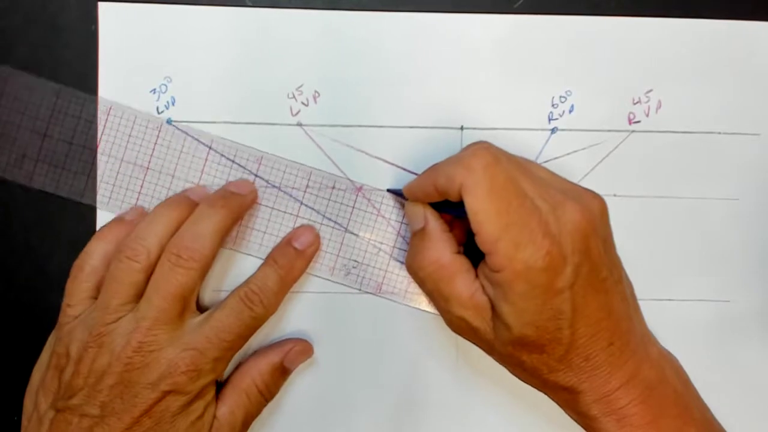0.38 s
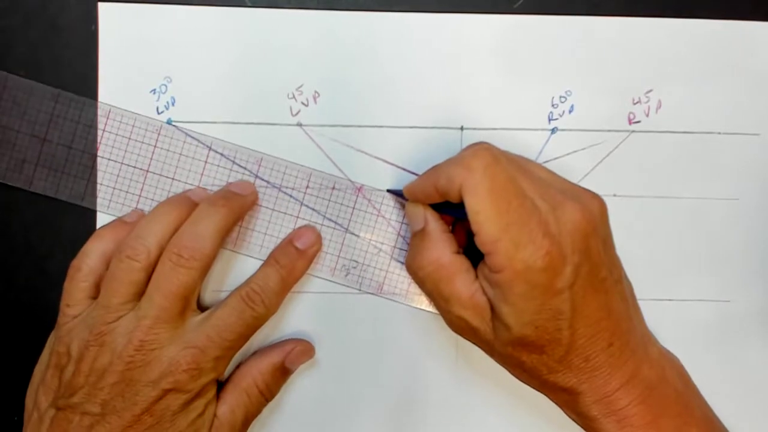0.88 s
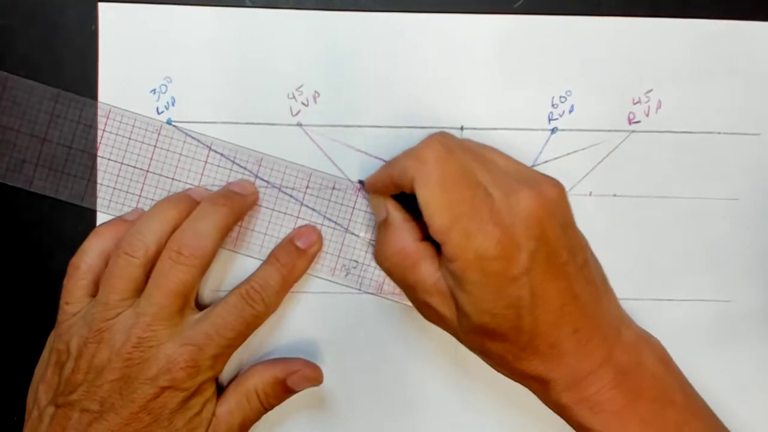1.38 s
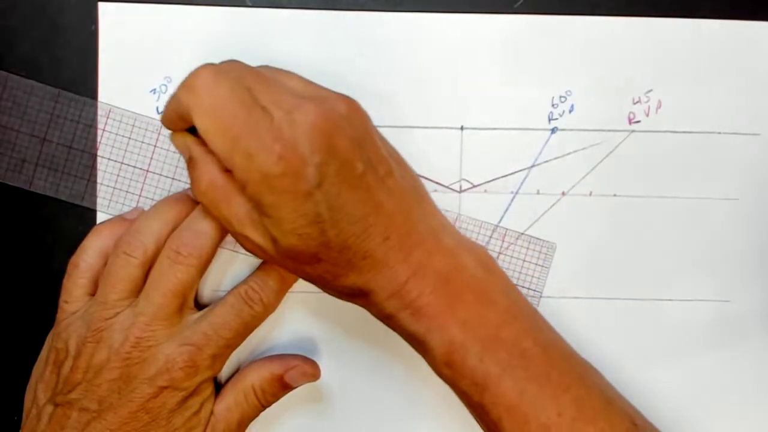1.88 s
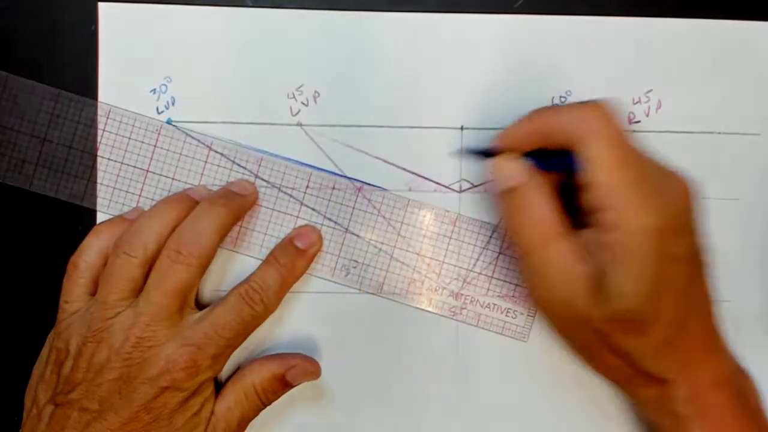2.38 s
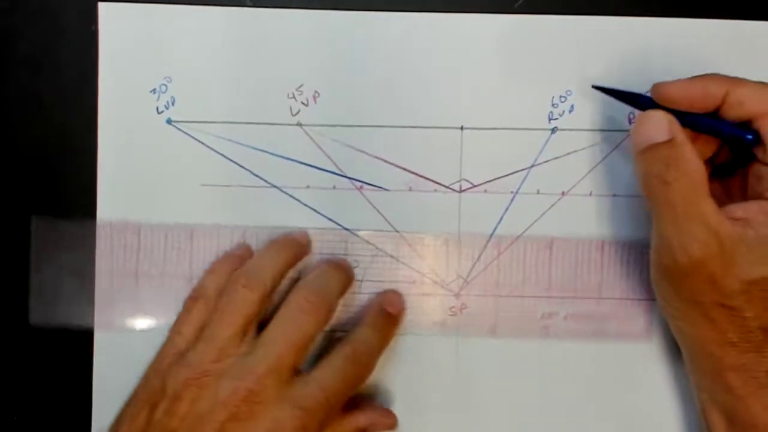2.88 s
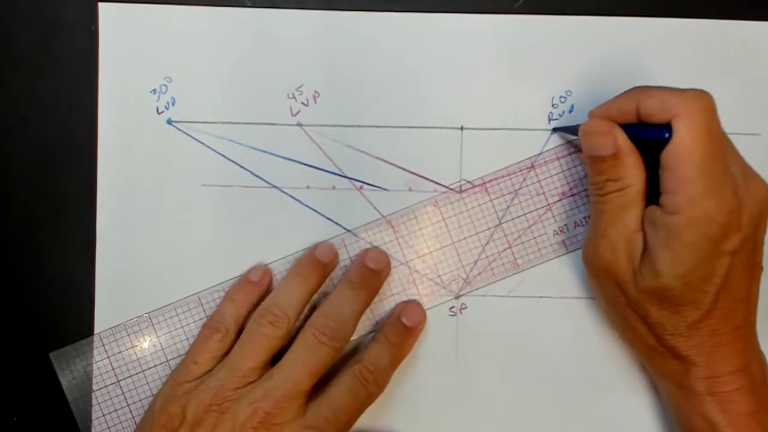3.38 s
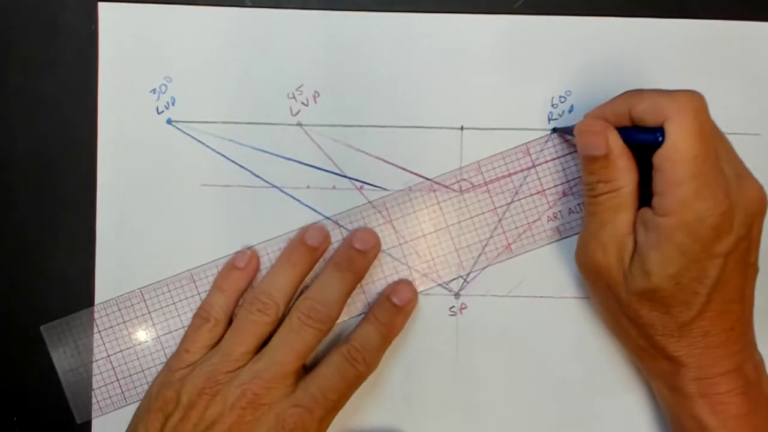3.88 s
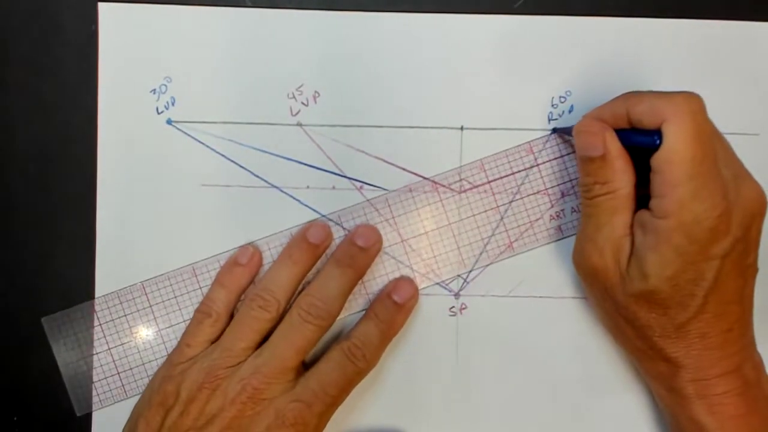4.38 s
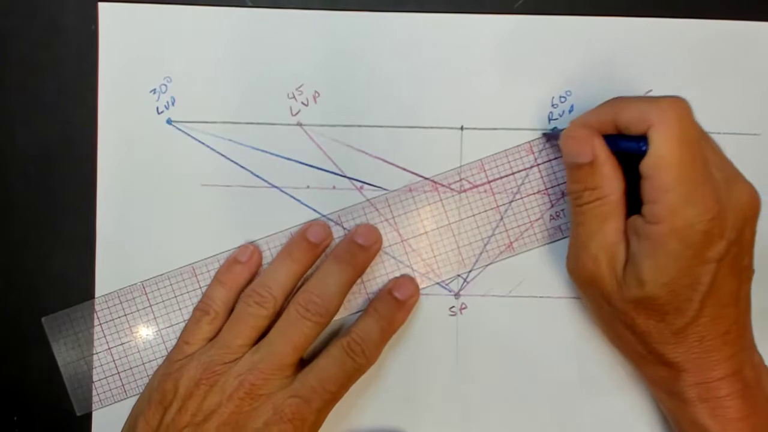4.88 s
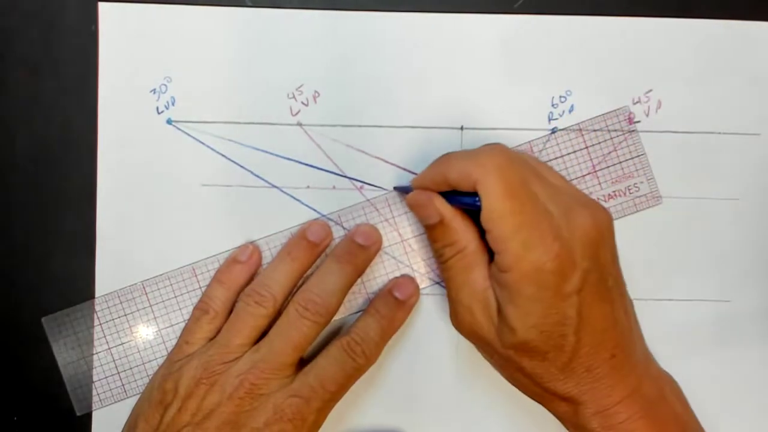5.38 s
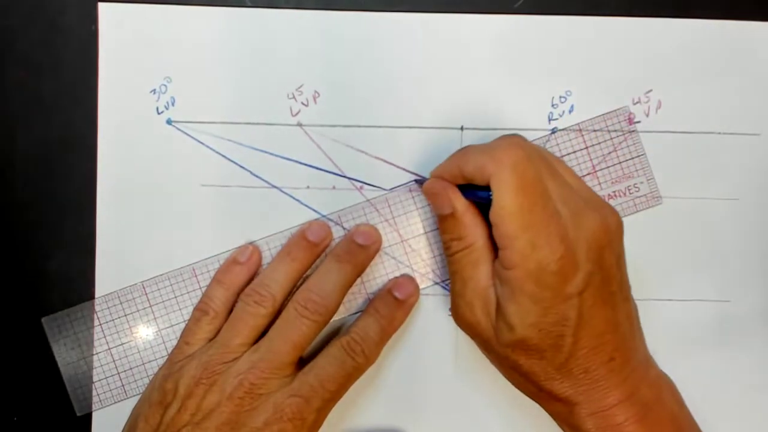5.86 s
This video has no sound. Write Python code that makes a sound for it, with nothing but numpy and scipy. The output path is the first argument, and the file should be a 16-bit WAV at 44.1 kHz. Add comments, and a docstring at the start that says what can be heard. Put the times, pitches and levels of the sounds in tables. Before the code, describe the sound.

A quiet, dry room with steady faint hiss, heard through a microphone standing on the desk, so arm movements come across as low, soft thuds and rumbling. In the first second there are only a slight brush of skin on paper and dull bumps. Tiny ticks of pen and ruler come at 1.1 to 1.3 s, then from about 1.35 s a grainy pen scratch runs along the ruler edge, fades towards 2.0 s, and returns as a second stroke until about 2.4 s. From 2.55 to 3.2 s the ruler slides over the paper in bright, rustling sweeps, the strongest movement, with a cluster of thuds and a click near 2.8 s. Small plastic taps follow at 3.35 and 3.57 s. It calms to sparse bumps and faint rubs until a smooth hand slide at 4.9 to 5.35 s. Short, light pen scratches come at about 5.45, 5.75 and 6.0 s.

```python
"""At a desk in a quiet room, a pen draws along a plastic ruler on paper; hand and ruler slide over the sheet.
The microphone stands on the same desk: pushes ring its modes as low thuds, and resting arms sway and judder it.
Grainy noise makes the pen's scratch, edge scrape and tip hiss, and the smoother slides of skin and ruler.
Touches of pen tip and ruler ring decaying sines with bursts of noise, over a steady hiss with narrow bands."""
import sys
import numpy as np
from scipy import signal
from scipy.fft import rfft, irfft, next_fast_len
from scipy.io import wavfile
from scipy.ndimage import uniform_filter1d, map_coordinates

SR = 44100
rng = np.random.default_rng(int(sys.argv[2]) if len(sys.argv) > 2 else 0)


def master_out(mix):
    """Clip the mix to full scale and print it as 16-bit PCM to the path in sys.argv[1]."""
    frames = np.transpose(np.atleast_2d(mix))
    ceiling = np.clip(frames, -1, 1)
    pcm = np.round(ceiling * 32767).astype(np.int16)
    wavfile.write(sys.argv[1], SR, pcm)


def gain_from_db(level_db):
    """Turn a decibel level (scalar or array-like) into a linear amplitude factor."""
    decades = np.asarray(level_db, float) / 20
    return 10 ** decades


N = 275344
TURN_S, DABS_S = 2.04, 5.4  # the pen turns back; later it only dabs, under the resting hand

# pushes on the desk: t/s, strength/dB, direction (1 or -1), contact before softening/ms
PUSHES = [(0.5437, -28.5, 1, 0.9), (0.9143, -31.5, -1, 1.7), (1.3166, -36, 1, 1.8), (1.341, -29.5, 1, 5.5),
          (1.3729, -27.5, -1, 4.9), (1.3996, -25.5, 1, 7.4), (1.45, -35, -1, 16), (1.479, -27.5, 1, 4.2),
          (1.5242, -26.5, -1, 0.57), (1.6075, -32.5, -1, 4.3), (1.9621, -32.5, 1, 1.8),
          (2.538, -23.5, -1, 0.5), (2.6442, -23.5, -1, 3.3), (2.679, -21.5, 1, 3.5), (2.706, -24, 1, 4.9),
          (2.7631, -19.5, 1, 10.2), (2.8018, -34, -1, 2.9), (2.838, -27, 1, 7), (2.8847, -26, -1, 4.4),
          (2.9352, -21, -1, 17), (2.9635, -35.5, -1, 2.4), (2.998, -32, -1, 11), (3.0931, -33.5, -1, 5.3),
          (3.2155, -27.5, -1, 0.54), (3.2755, -32, 1, 9.3), (3.3128, -32.5, 1, 6.5), (3.352, -33, 1, 1.9),
          (3.3776, -24.5, -1, 3.8), (3.5, -31, 1, 7.9), (3.901, -33.5, 1, 2.45), (4.2723, -27, 1, 0.9),
          (4.5635, -31, -1, 2.2), (4.688, -29.5, -1, 9.4), (4.9054, -36, -1, 5.2), (5.127, -28.5, -1, 6.4),
          (5.169, -52, 1, 7), (5.3574, -36, 1, 4.9), (5.475, -45, 1, 5.8), (5.691, -39.5, 1, 7.1),
          (5.8922, -37, 1, 6.1)]
# skin and ruler sliding on paper: start/s, length/s, bright level/dB, low part re bright level/dB
SLIDE_STROKES = [(0.385, 0.14, -67, -1.5), (0.58, 0.058, -80, 3), (0.95, 0.15, -79, 5),
                 (1.05, 0.32, -79.5, 5), (1.22, 0.11, -74.5, 3.5), (2.605, 0.084, -61.5, 4),
                 (2.645, 0.18, -53, -6), (2.75, 0.14, -56.5, -1), (2.81, 0.14, -55.5, -4.5),
                 (2.91, 0.13, -55, -4), (2.97, 0.23, -61.5, -1.5), (3.2, 0.11, -69.5, -2),
                 (3.29, 0.13, -66.5, -1), (3.38, 0.13, -84, 11), (3.5, 0.097, -70.5, -0.5),
                 (3.58, .1, -82, 11), (3.7, 0.091, -75, 2), (3.82, 0.2, -84, 1), (4.11, 0.085, -75, 4),
                 (4.36, 0.052, -72, 1.5), (4.875, 0.13, -69, -1), (4.93, 0.2, -62.5, 1.5),
                 (4.97, 0.36, -57.5, -2), (5.13, 0.26, -61.5, -2.5)]


def unit(x):
    """Scaled to rms 1."""
    return x / np.sqrt(np.mean(x ** 2) + 1e-20)


def curves(rows):
    """One value per sample for each column after the time."""
    s, *cols = np.transpose(rows)
    return [np.interp(np.arange(N) / SR, s, c) for c in cols]


def wobble(rate):
    """A smooth random curve, rate knots a second."""
    knots = rng.standard_normal(int(N * rate / SR) + 4)
    return map_coordinates(knots, [np.arange(N) * rate / SR])


def filtered(x, response):
    """x times a response of frequency."""
    m = next_fast_len(N + 8192)
    return irfft(rfft(x, m) * response(np.fft.rfftfreq(m, 1 / SR)), m)[:N]


def coloured(x, spectrum):
    """x shaped by (f/Hz, level/dB) points joined on a log frequency axis, rms 1."""
    f, db = np.transpose(spectrum)
    return unit(filtered(x, lambda hz: gain_from_db(np.interp(np.log(hz + 1), np.log(f + 1), db))))


def fibres(spread_db, patchy_db):
    """Paper fibres catching: noise with uneven grain sizes and streaks of random gain."""
    grains = rng.standard_normal(N) * gain_from_db(spread_db * wobble(900))
    z = signal.stft(grains, nperseg=512)[2]
    field = uniform_filter1d(rng.standard_normal(z.shape), size=3, axis=0)  # across frequency
    field = uniform_filter1d(field, size=20, axis=1)  # along time
    return signal.istft(z * gain_from_db(patchy_db * unit(field)), nperseg=512)[1][:N]


def fading(power, fade_s):
    """Power that dies away 60 dB in fade_s, as gain; steady power passes unchanged."""
    keep = gain_from_db(-2 * 60 / (fade_s * SR))
    return np.sqrt(signal.lfilter([1 - keep], [1, -keep], power))


def swells(rows, peak, sharp):
    """Each row swells and sinks once, peaking at this share of its length; gains for level and relative columns."""
    linger_s = 0.075  # sheet and room die away 60 dB in this time
    power = 0
    for s, length, db, *rel in rows:
        progress = np.clip((np.arange(N) / SR - s) / length, 0, 1)
        warped = progress ** (np.log(.5) / np.log(peak))
        swell = np.abs(np.sin(np.pi * warped)) ** sharp  # sharper means narrower
        power = power + np.outer(gain_from_db(db + np.array([0, *rel])), swell) ** 2
    return fading(power, linger_s)


def slide_gains():
    """Gains of the bright and low parts of each slide as it speeds up and slows down."""
    return swells(SLIDE_STROKES, peak=0.39, sharp=1.26)


def after_pushes(fade_s):
    """A gain that swells as the weight settles after every push and falls 60 dB in fade_s."""
    settle_s = .02  # the weight settles most strongly this long after a push
    power, settle = np.zeros(N), np.hanning(round(2 * settle_s * SR))
    for s, db, *_ in PUSHES:
        power[round(s * SR):][:len(settle)] += gain_from_db(2 * db) * settle
    return fading(power, fade_s)


def pen_motion():
    """Gains of scratch, edge scrape and tip hiss, from the pen's pressure and speed and its later dabs."""
    # the line, pushed out and pulled back: t/s, pressure as scratch level/dB, speed as hiss level/dB
    line = [(1.328, -120, -120), (1.343, -58.5, -65.5), (1.44, -61.5, -69), (1.49, -57, -60),
            (1.6, -57.5, -56.5), (1.72, -61.5, -59), (1.81, -67, -63), (1.85, -69, -68), (1.96, -71, -68),
            (2.01, -79, -86), (2.07, -82, -80), (2.11, -68, -66.5), (2.2, -63.5, -60.5), (2.3, -59, -60),
            (2.35, -64, -64.5), (2.38, -70, -76), (2.47, -120, -120)]
    # short dabs: start/s, length/s, scratch level/dB, edge scrape re scratch/dB, tip hiss re scratch/dB
    dab_strokes = [(5.45, 0.084, -71.5, -2.5, 3), (5.744, .13, -63.5, -5, 5), (5.88, .1, -78.5, -2, -3),
                   (5.986, 0.15, -65, -5.5, 3), (6.1, .1, -74, -10, -5)]
    push_db, pull_db = -61, -62.5  # edge scrape at a -60 dB stroke
    grows_db_per_s = 2.5  # the pushed pen leans ever more into the edge
    per_pressure, per_speed = 0.24, 0.38  # dB of scrape per dB of each
    pressure_db, speed_db = curves(line)
    t = np.arange(N) / SR
    edge_db = np.where(t < TURN_S, push_db + grows_db_per_s * (t - line[4][0]), pull_db)
    edge_db = edge_db + per_pressure * (pressure_db + 60) + per_speed * (speed_db + 60)
    edge_db = np.minimum(edge_db, pressure_db + 10)  # no scrape once the pen lifts
    scratch, edge, _ = swells(dab_strokes, peak=0.35, sharp=0.43)
    hiss = swells(dab_strokes, peak=0.36, sharp=2.2)[2]
    return gain_from_db(pressure_db) + scratch, gain_from_db(edge_db) + edge, gain_from_db(speed_db) + hiss


def floor():
    """Room air and preamplifier: steady hiss with a few narrow bands."""
    # spectrum of the hiss: f/Hz, density/dB
    air = [(150, -27), (250, 1), (660, -12), (812, -9.5), (2070, -19), (2590, -22.5), (3190, -21),
           (7850, -22.5), (8710, -26), (15700, -27.5)]
    # narrow bands standing in it: f/Hz, width/Hz, level/dB
    whines = [(2620, 880, -89), (4600, 50, -93.5), (5734, 53, -89.5), (6460, 260, -89.5), (7680, 260, -92),
              (8020, 500, -85.5)]
    out = gain_from_db(-70.5) * coloured(rng.standard_normal(N), air)
    for centre_hz, width_hz, db in whines:
        band = filtered(rng.standard_normal(N), lambda hz: 1 / (1 + (2 * (hz - centre_hz) / width_hz) ** 2))
        out = out + gain_from_db(db) * unit(band)
    return out


def desk_thuds():
    """Pushes ring the modes of desk and microphone stand; a longer contact drives fewer high modes."""
    # modes: f/Hz, first swing (1 = up), t60/s
    modes = [(39.1, -.49, .275), (49.8, .1, .8), (70.1, .68, .212), (96.7, .25, .354), (162, .07, .129),
             (198, .52, .044), (226.2, -.1, .225), (237.9, -.31, .092), (435, .03, .1)]
    t = np.arange(SR // 2) / SR
    ring = sum(swing * gain_from_db(-60 * t / t60) * np.sin(2 * np.pi * hz * t) for hz, swing, t60 in modes)
    force = np.zeros(N + SR)
    for s, db, direction, ms in PUSHES:
        contact = np.hanning(round(max(ms, 1.4) * SR / 1000) + 40)  # softened by 40 samples
        force[round(s * SR):][:len(contact)] += direction * gain_from_db(db) * contact / contact.sum()
    return signal.fftconvolve(force, ring)[:N]


def desk_unrest():
    """The restless weight of the arms sways the desk; dragging pen, hand and ruler make it judder."""
    # how heavily the arms rest: t/s, sway level before lurching/dB
    lean = [(0, -57), (.45, -56), (.84, -59.5), (1.05, -51.5), (1.9, -54), (2.4, -54.5), (3.6, -49),
            (4.1, -55.5), (4.85, -52.5), (5.45, -54), (5.64, -54.5), (6.24, -56.5)]
    # spectra of sway and judder: f/Hz, density/dB
    sway_spectrum = [(8.8, -34), (15, -0.5), (54, -2), (75, -9.5), (102, -6.5), (140, -22.5), (180, -68.5),
                     (310, -120)]
    judder_spectrum = [(79, -50), (135, -6), (162, 3.5), (199, -3), (231, 2), (302, -21), (424, -22),
                       (500, -33.5), (650, -53), (1100, -120)]
    # judder at a -60 dB scratch (pushed, pulled, dabbing) or a -60 dB slide
    pen_judder_db, slide_judder_db = [-51, -62, -47], -57
    per_pen, per_slide = 1.65, 0.78  # dB gained per dB of scratch, of slide
    scratch = pen_motion()[0]
    stage = np.searchsorted([TURN_S, DABS_S], np.arange(N) / SR)  # 0 pushed, 1 pulled, 2 dabbing
    pen_drag = gain_from_db(pen_judder_db)[stage] * (scratch / gain_from_db(-60)) ** per_pen
    slide_drag = gain_from_db(slide_judder_db) * (slide_gains()[0] / gain_from_db(-60)) ** per_slide
    # each in turn: at rest, after pushes (re their strength), while the pen works
    swaying = gain_from_db(curves(lean)[0]) + gain_from_db(-19) * after_pushes(fade_s=0.52) + gain_from_db(12.5) * scratch * (stage == 2)
    juddering = gain_from_db(-70.5) + gain_from_db(-25.5) * after_pushes(fade_s=0.1) + np.hypot(pen_drag, slide_drag)
    lurch_db = 3 * wobble(25)  # both come in lumps together
    sway = swaying * gain_from_db(0.57 * lurch_db) * coloured(rng.standard_normal(N), sway_spectrum)
    judder = juddering * gain_from_db(lurch_db) * coloured(rng.standard_normal(N), judder_spectrum)
    return sway + judder


def slide():
    """Skin and ruler rub the paper: a wide contact gives a smoother hiss than the pen."""
    # spectra of the bright part, the low part under the ruler and under the hand: f/Hz, density/dB
    rub = [(2650, -21), (4500, -11.5), (6200, -2.5), (7590, 1.5), (10600, -3.5), (12800, 0), (15500, -6.5)]
    drag = [(190, 3), (320, -6), (431, 1.5), (485, -6), (839, -14.5), (2330, -3), (5500, -11.5),
            (7150, -44), (12100, -120)]
    palm = [(190, -36), (320, -4), (463, -2), (640, -11), (1300, -12), (2200, -10), (4800, -16.5),
            (7150, -46), (12100, -120)]
    # the ruler moves: from/s, to/s
    ruler_moves = (2.5, 3.7)
    bright_gain, low_gain = slide_gains() * gain_from_db(0.67 * wobble(25))
    bright = bright_gain * coloured(fibres(spread_db=1.0, patchy_db=3.0), rub)
    low = fibres(spread_db=1.5, patchy_db=1.4)
    ruler = np.searchsorted(ruler_moves, np.arange(N) / SR) == 1
    return bright + low_gain * np.where(ruler, coloured(low, drag), coloured(low, palm))


def ticks():
    """Each touch rings the ruler briefly, with a crack and a short scuff; light touches start softly."""
    # pen tip and ruler edge touching: t/s, level before a 10 dB cut/dB, crack before a 15 dB lift/dB
    touches = [(1.1121, -48, -8), (1.17, -49.5, -15), (1.2301, -44, -22), (1.3428, -52, 5),
               (2.7949, -41, -14), (3.3398, -39, -13.5), (3.3472, -49, -18), (3.3584, -45, -22),
               (3.5688, -40, -11.5), (3.5824, -46, -22)]
    # ruler modes: f/Hz, mean level/dB, t60/s
    ruler_modes = [(1340, -8, 0.03), (2126, -9, 0.046), (2350, -2, 0.019), (3040, -3, 0.013),
                   (5440, -20, .01)]
    out, t = np.zeros(N + SR), np.arange(SR // 10) / SR
    for s, db, treble_db in touches:
        ring = 0
        for hz, level, t60 in ruler_modes:
            ring = ring + gain_from_db(level + rng.normal(0, 2.7) - 60 * t / t60) * np.sin(2 * np.pi * hz * t)
        crack = gain_from_db(treble_db + 15 - 60 * t / .016) * uniform_filter1d(rng.standard_normal(len(t)), size=2)
        scuff = gain_from_db(-60 * t / 0.12) * uniform_filter1d(rng.standard_normal(len(t)), size=7)
        rise = 1 - np.exp(-t / (.0002 * gain_from_db(2.6 * (-42 - db))))
        out[round(s * SR):][:len(t)] += gain_from_db(db - 10) * rise * (ring + crack + scuff)
    return out[:N]


def pen():
    """The tip scratches the sheet, scrapes the ruler and hisses; three bounces off hand and ruler comb the hiss."""
    # spectra, f/Hz, density/dB: low scratch of the line and of the dabs
    sheet = [(250, -20), (430, 0), (640, -9), (800, 1.5), (880, -7.5), (1000, 0), (1130, -10), (1380, 0),
             (1650, -7.5), (2200, -9.5), (3200, -54), (5000, -120)]
    dab = [(200, -30), (400, 4.5), (1000, -1.5), (2000, -13.5), (4000, -60)]
    # scrape on the ruler edge, pen pushed and after it turns back; hiss of the tip
    edge_pushed = [(1300, -32), (2200, -10), (2550, 0.5), (2850, -3), (3400, -1), (3950, -0.5), (4600, -6),
                   (5100, -14.5), (7000, -13), (12000, -120)]
    edge_pulled = [(1000, -26), (1700, 2.5), (3070, 5.5), (3470, 3), (5500, -4.5), (7150, -34),
                   (12100, -120)]
    tip = [(3500, -30), (5200, -7), (7500, 0), (8800, -1.5), (10000, -2), (12500, -4), (14500, 1),
           (15800, -1)]
    # bounces under the hand come sooner or later as it travels: t/s, first delay/ms, strength (0-1)
    bounces = [(1.35, .65, .28), (1.95, .52, .25), (2.1, .52, .22), (2.38, .6, .22), (5.75, .7, .4),
               (6.1, .72, .33)]
    scratch_gain, edge_gain, tip_gain = pen_motion()
    press = gain_from_db(0.39 * wobble(30))
    scratch = fibres(spread_db=0.5, patchy_db=1.7)
    dabbing = np.arange(N) > DABS_S * SR
    direct = press * scratch_gain * np.where(dabbing, coloured(scratch, dab), coloured(scratch, sheet))
    scrape = fibres(spread_db=0.5, patchy_db=2.5)
    pushed = np.arange(N) < TURN_S * SR
    direct += press * edge_gain * np.where(pushed, coloured(scrape, edge_pushed), coloured(scrape, edge_pulled))
    hiss = press * tip_gain * coloured(fibres(spread_db=1.0, patchy_db=2.0), tip)
    ms, strength = curves(bounces)
    # later bounces at multiples of the first delay
    late = sum(map_coordinates(hiss, [np.arange(N) - k * ms * SR / 1000]) for k in (1, 2.17, 2.9))
    combed = (hiss + strength * late) / np.sqrt(1 + 3 * strength ** 2)
    return direct + combed


def scene():
    """All sources at one microphone."""
    return (floor() + desk_thuds() + desk_unrest() + slide() + ticks() + pen())[None]


def roll_off(x):
    """The treble ends steeply here."""
    return signal.sosfilt(signal.butter(12, 15890, fs=SR, output="sos"), x)


def record(dry):
    """The finished mix as it is delivered."""
    return roll_off(dry)


dry = scene()
out = record(dry)
master_out(out)
```